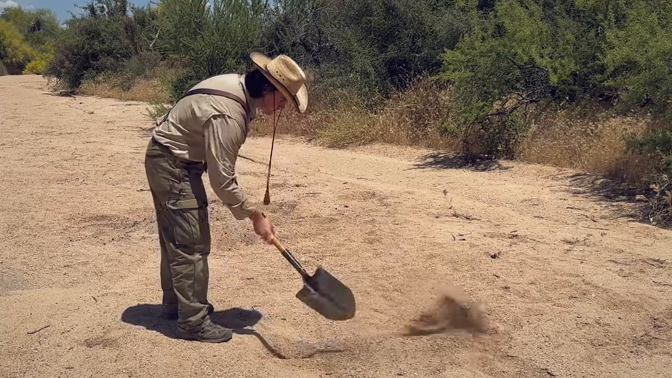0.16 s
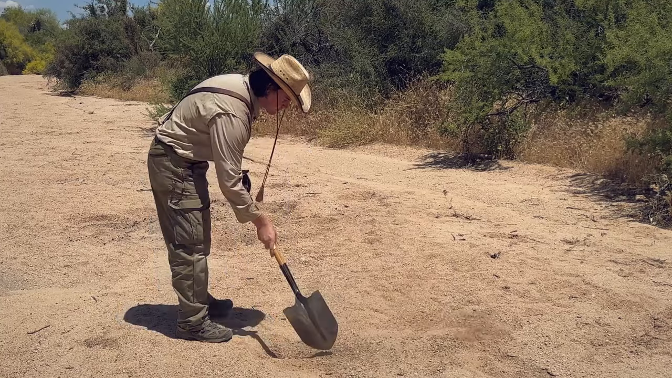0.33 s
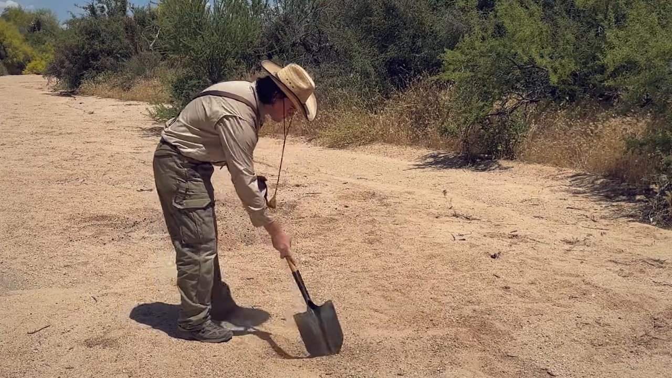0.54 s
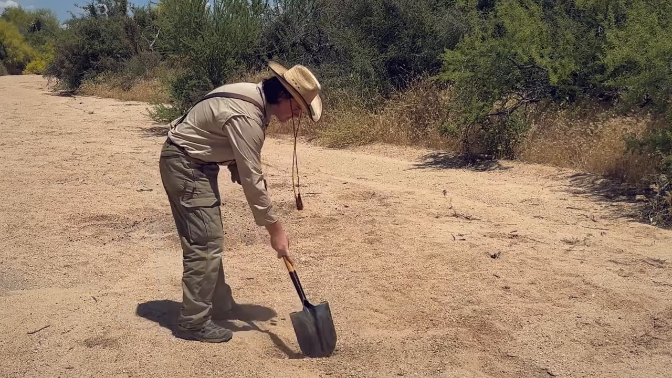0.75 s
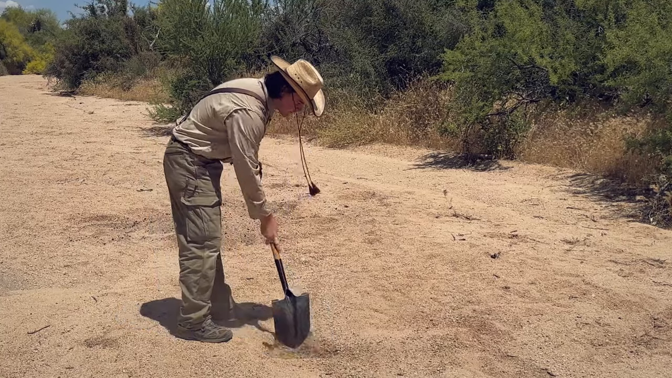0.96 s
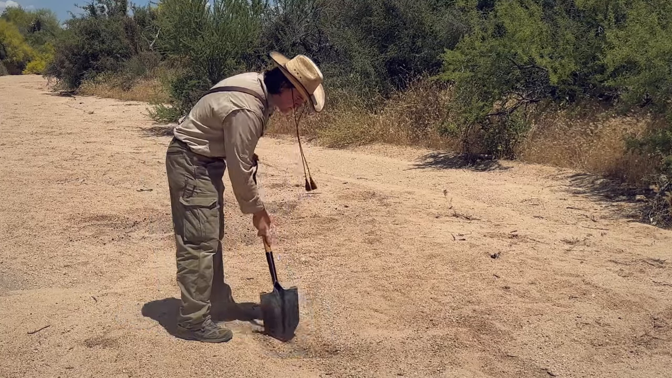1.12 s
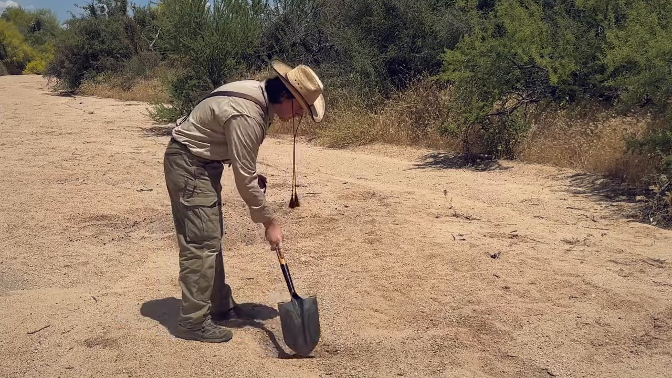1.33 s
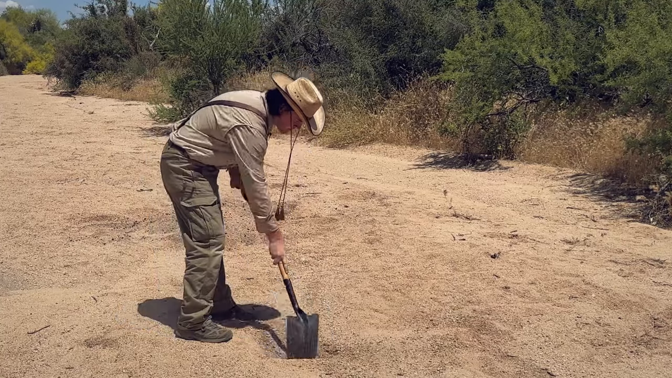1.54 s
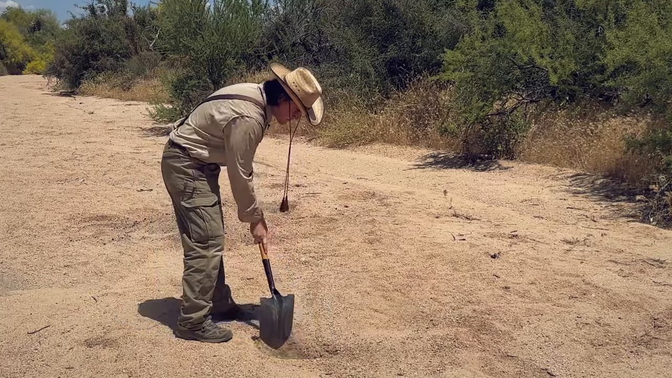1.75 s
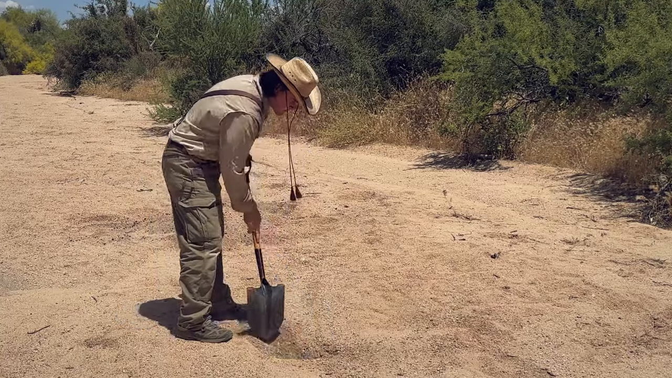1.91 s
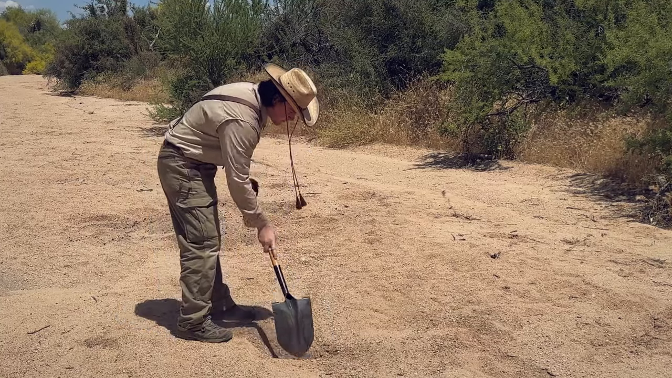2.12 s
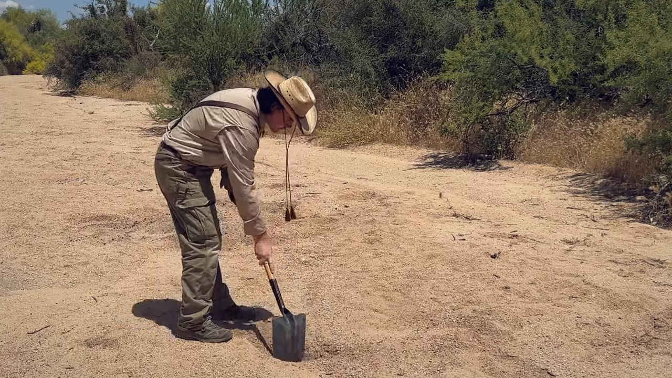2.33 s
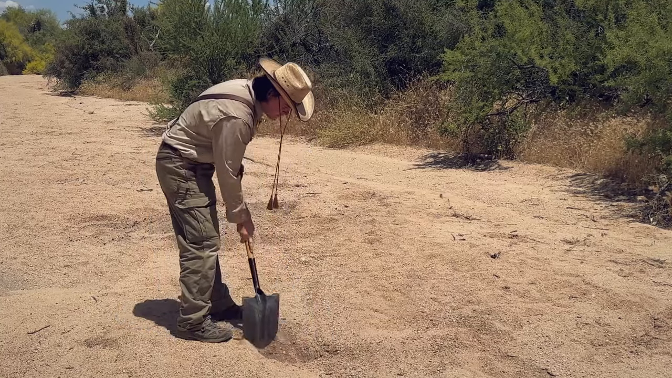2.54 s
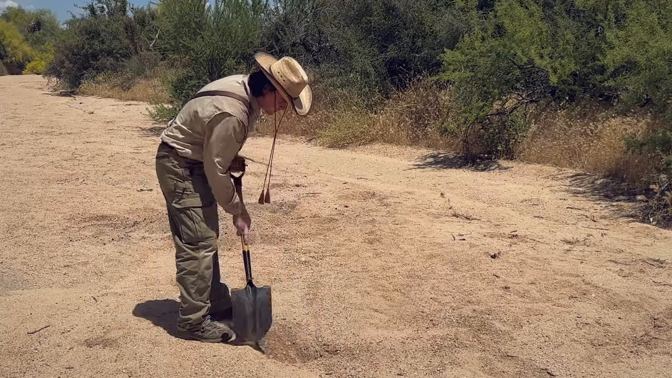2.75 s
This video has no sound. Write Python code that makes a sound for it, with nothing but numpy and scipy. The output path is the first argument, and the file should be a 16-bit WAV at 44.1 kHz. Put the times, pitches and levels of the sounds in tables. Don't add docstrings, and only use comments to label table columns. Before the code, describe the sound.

A steel shovel scrapes dry, gravelly sand outdoors. Thrown sand patters down at 0.2 s; the blade crunches down at 0.45-0.52, then drags with a swelling, juddering rasp from 0.7 to 1.1. A sharp stab at 1.4 leads to a rough pull, a snag at 1.75 and a flick. Another ringing stab at 2.2 and scrape fade by 2.75. Pebbles tick, grains sift; faint wind and distant rumble remain.

```python
import sys
import numpy as np
from scipy import signal
from scipy.fft import rfft, irfft
from scipy.io import wavfile
from scipy.ndimage import uniform_filter1d

SR = 44100
rng = np.random.default_rng(int(sys.argv[2]) if len(sys.argv) > 2 else 0)


def put_to_file(sound):
    columns = np.atleast_2d(sound).T
    safe = np.clip(columns, -1, 1)
    whole_steps = np.round(safe * 32767)
    wavfile.write(sys.argv[1], SR, whole_steps.astype(np.int16))


def elevation(decibels):
    levels = np.asarray(decibels, float)
    return 10 ** (levels / 20)


N = 127890
TIME = np.arange(N) / SR


def level(x, db=0):
    return x * elevation(db) / np.sqrt(np.mean(x ** 2))


def colour(x, table):
    hz, db = np.array(table, float).T
    f = np.linspace(1, SR / 2, num=2049)
    shape_db = np.interp(np.log(f), np.log(hz), db, right=db[-1] - 30)
    cepstrum = irfft(shape_db * np.log(10) / 20)
    cepstrum[1:2048] *= 2
    cepstrum[2049:] = 0
    response = irfft(np.exp(rfft(cepstrum)))
    return signal.fftconvolve(x, response)[:N]


def mode(x, hz, t60):
    r = np.exp(-np.log(1000) / (t60 * SR))
    w = 2 * np.pi * hz / SR
    gain = np.sin(w) * np.sqrt(2 * (1 - r * r))
    return signal.lfilter([gain], [1, -2 * r * np.cos(w), r * r], x)


def walk(rate):
    k = int(SR / rate)
    steps = np.repeat(rng.standard_normal(N // k + 1), k)
    smooth = uniform_filter1d(uniform_filter1d(steps, k), k)
    return level(smooth[:N])


def grains(per_s=16000, spread_db=2.2):
    hit = rng.random(N) < per_s / SR
    size = np.minimum(rng.exponential(size=N), 3)
    return level(hit * rng.standard_normal(N) * elevation(spread_db * size))


def gains(table):
    s, db = np.array(table, float).T
    return elevation(np.interp(TIME, s, db, left=-150, right=-150))


def knocks(rows):
    out = np.zeros(N + 8192)
    t = np.arange(8192) / SR
    for s, db, hz, crack_s, ring_s in rows:
        noise = rng.standard_normal(8192)
        bright = noise - np.roll(noise, shift=2)
        crack = bright * elevation(-60 * t / crack_s) * np.minimum(t / (0.035 * crack_s), 1)
        knock = mode(crack, hz, ring_s)
        i = int(s * SR)
        out[i:i + 8192] += elevation(db) * knock / np.abs(knock).max()
    return out[:N]


# (frequency [Hz], level [dB])
RUMBLE = [(53, -30), (90, -6), (312, -8), (363, -5), (574, -2.5), (1780, -17), (3590, -32.5),
          (15100, -55.5), (16500, -75)]
# (frequency [Hz], level [dB])
WIND_TONE = [(15, -11), (30, 2), (60, -13.5), (130, -9), (300, -13), (700, -16.5), (1500, -35.5),
             (5000, -62)]


def outdoors():
    rumble = sum(colour(rng.standard_normal(N), RUMBLE) * elevation(1.9 * walk(rate)) for rate in (1.5, 6, 15))
    rumble = level(rumble, -45)

    hum_hz, hum_width_hz, hum_db = 63, 6.9, -49
    hum = np.array([level(mode(rng.standard_normal(N), hum_hz, 2.0 / hum_width_hz), hum_db) for _ in range(2)])

    wind_db, swing_db = -45, 1.3
    wind = np.array([level(colour(rng.standard_normal(N), WIND_TONE) * elevation(swing_db * walk(3.25)), wind_db)
                     for _ in range(2)])
    deep = signal.sosfilt(signal.butter(2, 85, fs=SR, output="sos"), wind)

    rise_db_per_s, gust_db, gust_s, gust_len_s = 1.8, 6, 2.43, 0.056
    gust = rise_db_per_s * (TIME - TIME.mean())
    gust += gust_db * np.exp(-((TIME - gust_s) / gust_len_s) ** 2)
    lean = elevation(2.5 * np.array([[1], [-1]]))
    return rumble + hum * lean + deep * lean * elevation(gust) + (wind - deep) / lean


# (frequency [Hz], level after a stroke [dB], level after an earlier throw [dB], ring time t60 [s])
FREE_BLADE = [(3300, -9, -6, 0.98), (3485, -8, -18, 0.4), (3590, -12, -5, 0.74), (4280, -12, -13, 0.3),
              (4900, -1, -17, 0.32), (5270, -15, -12, 0.25)]


def free_blade(grit):
    stroke_db, throw_db = -33, -63
    throw = signal.unit_impulse(N) * elevation(throw_db) * 100
    return sum(mode(elevation(stroke_db + grit_gain) * grit + elevation(throw_gain) * throw, hz, t60)
               for hz, grit_gain, throw_gain, t60 in FREE_BLADE)


# (frequency [Hz], level [dB])
GRIT_TONE = [(880, -40), (1500, -6), (2010, -20), (2480, -4), (4130, -3.5), (4520, -1.5), (11000, -3),
             (15900, -10.5), (16500, -46)]
# (frequency [Hz], level [dB])
SAND_TONE = [(1470, -29), (2500, -11.5), (4660, -8), (7610, -1), (9270, -5), (15000, 1), (16100, -23.5),
             (16500, -37)]
# (time [s], level [dB])
LANDING_SAND = [(.18, -56), (.197, -46), (.207, -40.5), (.23, -44.5), (.265, -45), (.283, -55), (.3, -64)]


def sand():
    slide_db, slide_t60_s = -56.5, 0.41
    slide = elevation(slide_db - 60 * TIME / slide_t60_s) * level(colour(grains(), GRIT_TONE))
    patter = level(colour(grains() * elevation(2.6 * walk(90)), SAND_TONE))
    return gains(LANDING_SAND) * patter + slide


def trickle(near):
    t60_s = 0.38
    keep = elevation(-60 / t60_s / SR)
    load = signal.lfilter([1 - keep], [1, -keep], np.sqrt(np.abs(near)))
    return elevation(-38.5) * load * level(colour(grains(5000, 2.9), SAND_TONE))


# (time [s], peak level [dB], pitch [Hz])
PEBBLE_TICKS = [(.125, -47, 11100), (.62, -42, 8900), (.909, -19, 6000), (1.235, -49.5, 10000),
                (1.396, -25, 8000), (1.517, -23, 9500), (1.677, -27.5, 10000), (1.825, -15, 7540),
                (1.944, -57, 6000), (2.004, -51, 11100), (2.402, -21, 6000), (2.553, -17, 8950)]


def pebbles():
    crack_s, ring_s = .012, .0005
    return knocks([(s, db, hz, crack_s, ring_s) for s, db, hz in PEBBLE_TICKS])


# (time [s], peak level [dB], pitch [Hz], ring time t60
# [s])
CLEAR_RINGS = [
    (0.505, -36, 1540, 0.14),
    (2.223, -36, 1090, 0.33),
    (2.5, -36, 1540, 0.11),
    (1.11, -54, 3483, 0.31),
    (2.745, -63.5, 3325, 1.2),
    (2.74, -58, 3300, .3),
    (1.12, -59, 4600, .17),
    (.341, -42.5, 4200, .004),
]


def rings():
    crack_s = .012
    return knocks([(s, db, hz, crack_s, t60) for s, db, hz, t60 in CLEAR_RINGS])


# (time [s], extra share of force)
BIG_SLIPS = [(.716, 0.37), (.757, 0.71), (.8185, .6), (.853, .7), (.887, .6), (.908, .6), (.947, 0.39),
             (.981, 0.95), (1.019, 0.52), (1.058, 0.42), (1.092, 0.43), (1.41, 0.35), (1.435, 0.51),
             (1.553, .9), (1.619, 0.59), (1.712, .7), (1.727, .7), (1.825, 1.2), (2.3, 0.45), (2.339, .6),
             (2.368, 0.57), (2.402, 0.81), (2.451, .6), (2.476, 0.39), (2.518, 0.56), (2.567, 0.66),
             (2.595, .6), (2.63, .5), (2.695, 0.79), (2.725, .8)]


def slips():
    def settle(x, seconds):
        return signal.lfilter([1], [1, -np.exp(-1 / (seconds * SR))], x)

    small = (rng.random(N) < 40 / SR) * (0.22 + rng.random(N))
    big = np.zeros(N)
    for s, share in BIG_SLIPS:
        big[int(s * SR)] = share
    return 1 + .25 * settle(small, .008) + settle(big, 0.0082)


def patchy(x):
    band_hz, swing_db, swings_per_s = 1800, 1.7, 45
    spectrum = rfft(x)
    f = np.linspace(0, SR / 2, num=N // 2 + 1)
    out = np.zeros(N)
    for k in range(11):
        overlap = np.clip(1 - np.abs(f / band_hz - k), 0, 1)
        out += irfft(spectrum * overlap, N) * elevation(swing_db * walk(swings_per_s))
    return level(out)


def upper_modes(x):
    low_hz, high_hz, t60_s, swing_db = 3073, 14560, 0.012, 3.5
    place = (np.arange(30) + 0.66 * rng.random(30)) / 30
    swing = [walk(14.17) for _ in range(6)]
    out = np.zeros(N)
    for k, hz in enumerate(low_hz + (high_hz - low_hz) * place):
        shifted = np.roll(swing[k % 6], k * 5003)
        out += elevation(swing_db * shifted) * mode(x, hz, t60_s)
    return level(out)


# (frequency [Hz], level [dB])
SOIL_TONE = [(200, -15.5), (400, 2), (700, 0.5), (1200, -5), (2000, -3), (3500, -18.5)]
# (frequency [Hz], level [dB])
BURIED_BLADE = [(735, -7), (1088, -11), (1536, -7), (2290, -10), (2410, -4), (2495, 0.5), (2650, -1.5),
                (2790, 0.5), (2975, -0.5), (3640, 1.5), (4610, 1.5), (5730, 0.5)]
# (time [s], level [dB])
SET_DOWN_FORCE = [(.431, -61), (.437, -37.5), (.45, -34.5), (.48, -32), (.508, -31), (.52, -44),
                  (.535, -62)]
SHUFFLE_FORCE = [(.535, -56.5), (.59, -52), (.625, -50), (.645, -66), (.67, -69.5)]
DRAG_START_FORCE = [(0.669, -61), (.688, -39.5), (.725, -34), (.79, -35.5), (.82, -33.5), (.84, -36),
                    (.858, -35), (.88, -37.5)]
DRAG_MID_FORCE = [(.88, -35), (.89, -33), (.905, -33.5), (.94, -28.5), (.972, -33), (.99, -35)]
DRAG_END_FORCE = [(0.99, -32), (1.025, -29.5), (1.045, -28), (1.065, -30), (1.1, -38), (1.14, -56),
                  (1.2, -70)]
STAB_FORCE = [(1.393, -70), (1.396, -33.5), (1.42, -31), (1.44, -31), (1.51, -46), (1.55, -54)]
PULL_FORCE = [(1.55, -50), (1.63, -39.5), (1.7, -45.5), (1.746, -41.5)]
SNAG_FORCE = [(1.746, -38), (1.753, -24), (1.761, -28.5), (1.777, -40.5), (1.81, -40)]
FLICK_FORCE = [(1.81, -40), (1.822, -34.5), (1.838, -37), (1.851, -31), (1.862, -47), (1.874, -39.5),
               (1.91, -58), (1.98, -69)]
STAB_TWO_FORCE = [(2.194, -66), (2.195, -33), (2.22, -27.5), (2.262, -35.5), (2.275, -49), (2.29, -43)]
DRAG_TWO_FORCE = [(2.29, -44.5), (2.339, -34.5), (2.435, -34), (2.455, -30), (2.5, -33), (2.512, -39.5),
                  (2.52, -37)]
LIFT_FORCE = [(2.52, -33.5), (2.548, -33), (2.554, -27), (2.6, -34.5), (2.66, -46.5)]
POUR_FORCE = [(2.661, -46.5), (2.725, -48), (2.79, -69)]
# (favoured pitch [Hz], blade ring level [dB], soil level [dB], fine grit level [dB])
STROKE_BLEND = [(2450, -5.5, -16, -12), (2500, -4.5, -23, -19), (2460, -10, -13.5, -8.5),
                (2500, -11, -15.5, -3), (2430, -8, -28, -3), (2630, -6.5, -14.5, -5.5),
                (2660, -12, -7, -3.5), (3000, -7, -12.5, -26), (2400, -26, -12.5, -6),
                (3070, -8.5, -12.5, -4.5), (2950, -14.5, -8.5, -4), (2480, -20, -14.5, -11),
                (3880, -7.5, -31, -29)]


def shovel():
    patchy_db = 2
    slip = slips()
    chatter = elevation(1 * walk(160)) * slip

    grit = patchy(colour(grains() * chatter, GRIT_TONE))
    grit = level(grit + elevation(2.5) * upper_modes(grit))
    fine_hz, fine_t60_s = 10430, 0.00069
    fine = level(mode(grains() * elevation(patchy_db * walk(60)) * slip, fine_hz, fine_t60_s))
    push = level(grains(6000, 2.5) * chatter)
    soil = level(colour(grains(3000, 2.5) * elevation(patchy_db * walk(40)), SOIL_TONE))

    strokes = [SET_DOWN_FORCE, SHUFFLE_FORCE, DRAG_START_FORCE, DRAG_MID_FORCE, DRAG_END_FORCE, STAB_FORCE,
               PULL_FORCE, SNAG_FORCE, FLICK_FORCE, STAB_TWO_FORCE, DRAG_TWO_FORCE, LIFT_FORCE, POUR_FORCE]
    favour_octaves = 0.19
    blade_hz = np.array(BURIED_BLADE)[:, 0]
    scrape = np.zeros(N)
    drive = np.zeros((len(BURIED_BLADE), N))
    for stroke, (favoured_hz, ring_db, soil_db, fine_db) in zip(strokes, STROKE_BLEND):
        force = gains(stroke)
        scrape += force * (0.76 * grit + elevation(soil_db) * soil + elevation(fine_db) * fine)
        distance = np.log2(blade_hz / favoured_hz) / favour_octaves
        share = 0.58 + np.exp(-distance ** 2)
        drive += share[:, None] * force * elevation(ring_db) * push

    blade_t60_s = 0.032
    blade = sum(elevation(db + patchy_db * walk(15)) * mode(d, hz, blade_t60_s)
                for d, (hz, db) in zip(drive, BURIED_BLADE))
    return scrape + 0.31 * blade + free_blade(scrape)


# (time [s], peak level [dB], pitch [Hz], crack time t60 [s])
STONE_CRUNCHES = [(.492, -23, 2400, 0.02), (0.503, -19.5, 2550, 0.01), (0.918, -27.5, 2460, 0.09),
                  (1.019, -31, 2450, 0.036), (1.055, -32, 2280, 0.07), (1.436, -24.5, 2590, 0.0096),
                  (1.755, -26, 1116, 0.029), (1.757, -30.5, 650, 0.039), (2.213, -28, 2740, 0.17),
                  (2.214, -26, 3550, 0.11), (2.218, -31, 400, 0.04), (2.213, -34, 1540, .06),
                  (2.402, -31, 2950, 0.088), (2.47, -31, 2880, 0.065), (2.553, -27, 2410, 0.092),
                  (2.565, -29, 440, 0.05), (2.555, -32.5, 733, 0.057), (2.556, -31, 3220, 0.045),
                  (2.595, -34, 2400, 0.028), (2.554, -31.5, 1460, 0.06), (.452, -34, 2310, .1),
                  (.716, -36, 3500, .05), (.722, -32, 2670, 0.054), (.757, -33, 690, 0.037),
                  (.818, -33, 2320, .06), (.915, -33, 740, 0.1), (.915, -35, 1190, 0.085),
                  (.918, -34.5, 1800, .06), (.981, -27.5, 9740, .06), (1.019, -27, 9150, .05),
                  (1.085, -37.5, 1390, .06), (1.089, -31, 3000, .04), (1.42, -39, 760, 0.11),
                  (1.431, -35.5, 1100, 0.088), (1.824, -26, 7940, .03), (2.3, -42, 2020, .04),
                  (2.447, -42, 1800, .05), (2.47, -34, 1160, 0.058), (2.49, -34, 685, .05),
                  (2.625, -43, 2270, 0.042), (1.755, -32.5, 830, 0.047), (1.755, -27, 2730, 0.035),
                  (1.943, -42, 650, .015), (1.025, -36, 720, .08), (.715, -37, 734, .1),
                  (1.42, -30, 3650, 0.093), (2.45, -37, 560, 0.061), (1.835, -31, 7020, 0.048)]


def stones():
    ring_s = 0.024
    return knocks([(s, db, hz, crack_s, ring_s) for s, db, hz, crack_s in STONE_CRUNCHES])


def scene():
    near = sand() + pebbles() + rings() + shovel() + stones()
    t = np.arange(8192) / SR
    scatter_t60_s, scatter_db = 0.09, -12.5
    tail = rng.standard_normal(8192) * elevation(-60 * t / scatter_t60_s)
    tail = tail / np.linalg.norm(tail)
    near = near + elevation(scatter_db) * signal.fftconvolve(near, tail)[:N]
    return near + trickle(near) + outdoors()


def band_limit(x):
    return signal.sosfilt(signal.butter(12, 16670, fs=SR, output="sos"), x)


def record(dry):
    top_cut = signal.ellip(8, .3, 50, 15900, fs=SR, output="sos")
    mix = signal.sosfilt(top_cut, dry)
    return band_limit(mix)


dry = scene()
out = record(dry)
put_to_file(out)
```